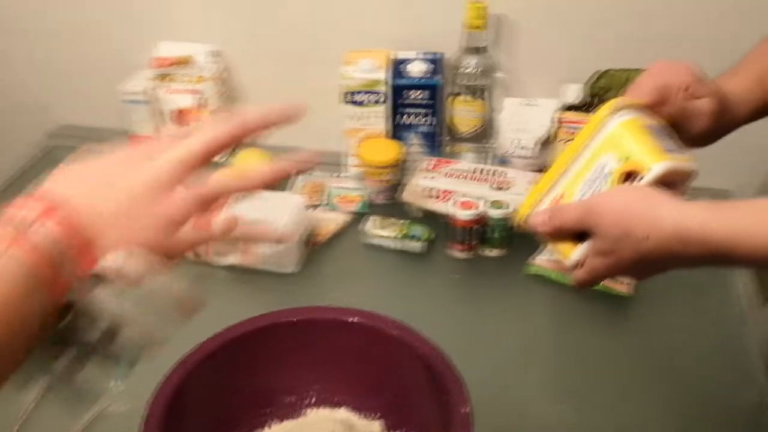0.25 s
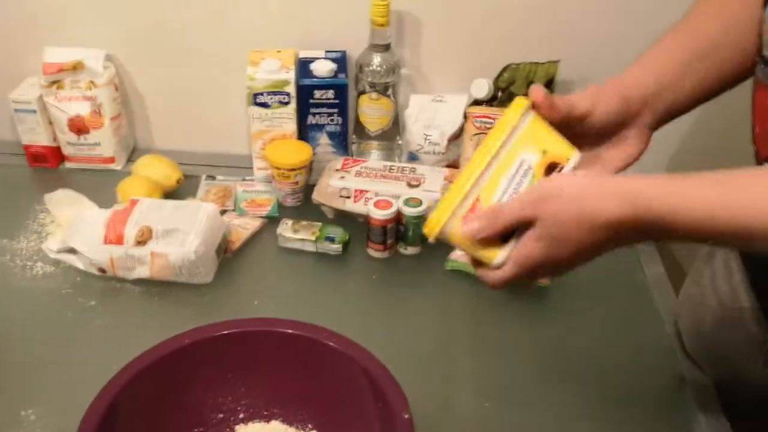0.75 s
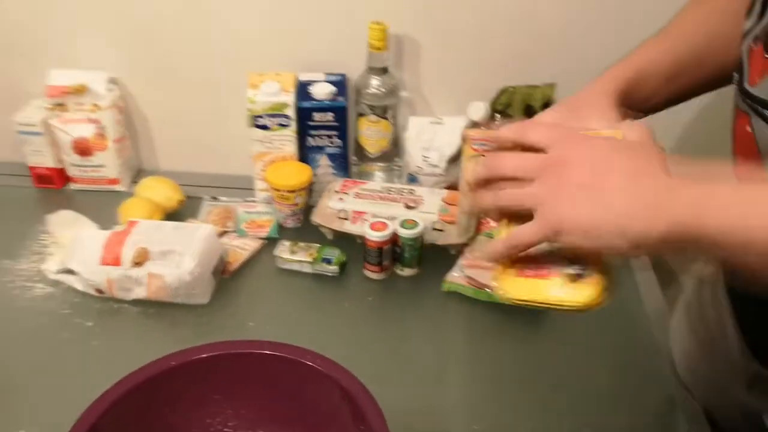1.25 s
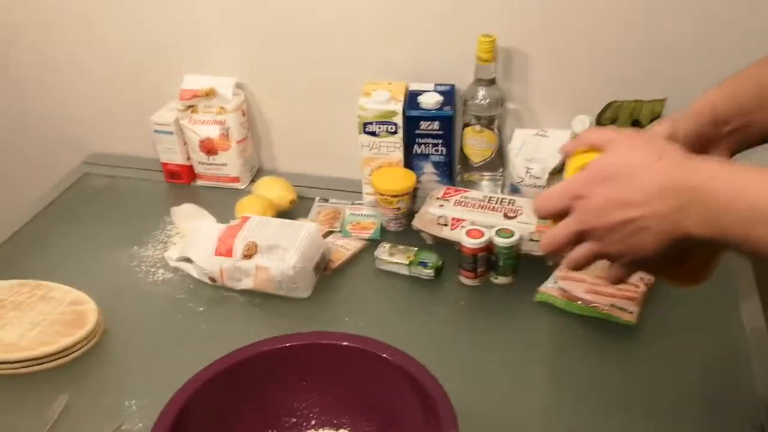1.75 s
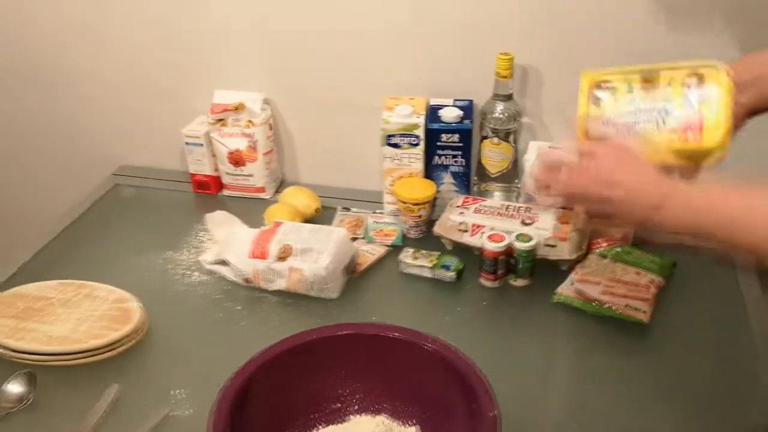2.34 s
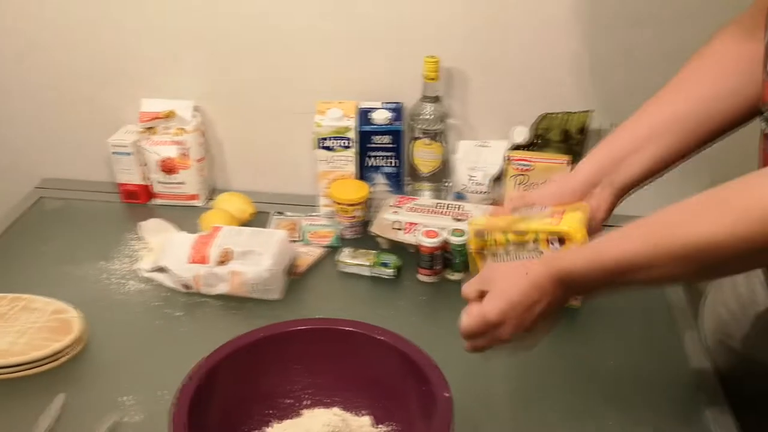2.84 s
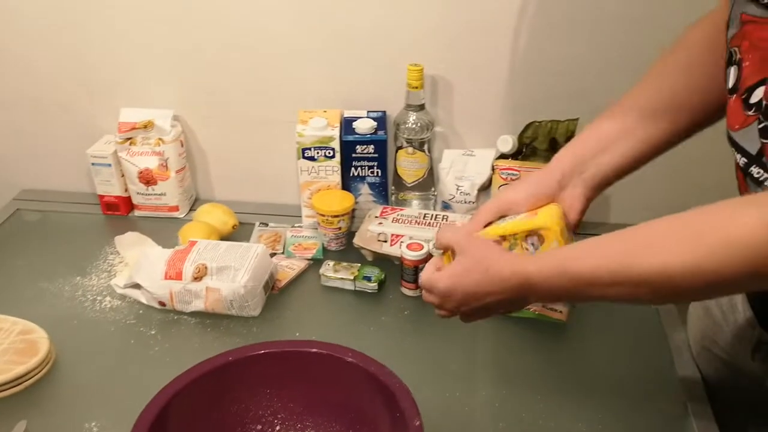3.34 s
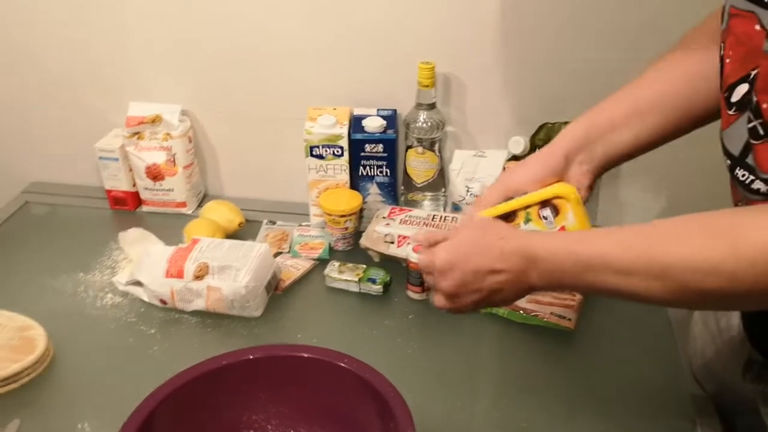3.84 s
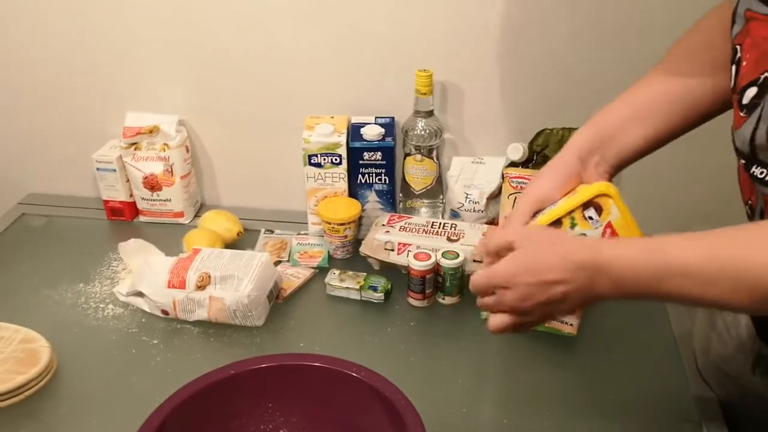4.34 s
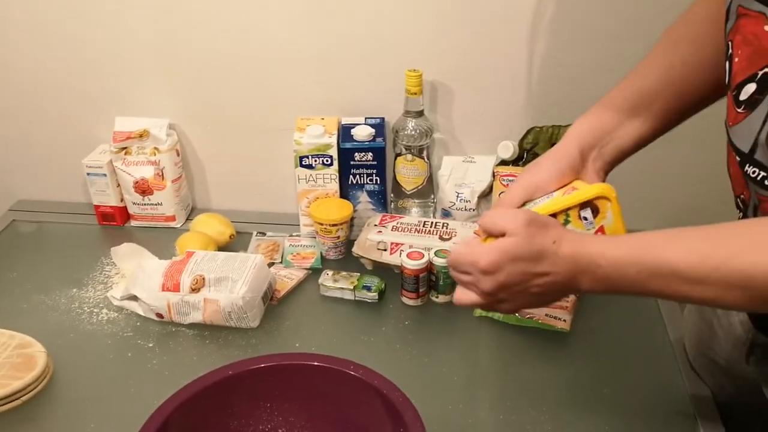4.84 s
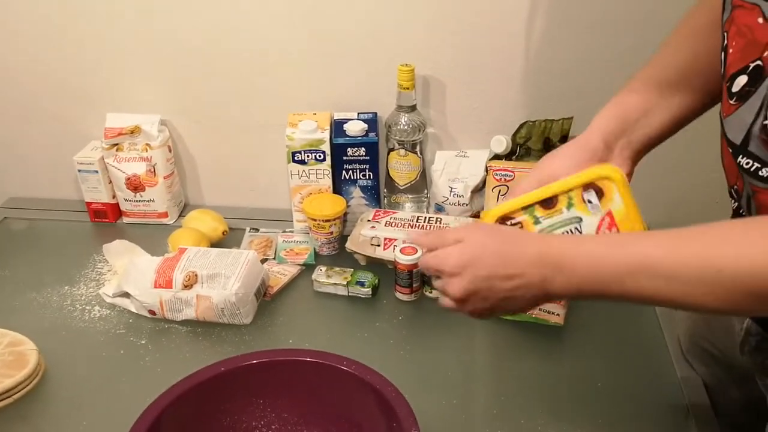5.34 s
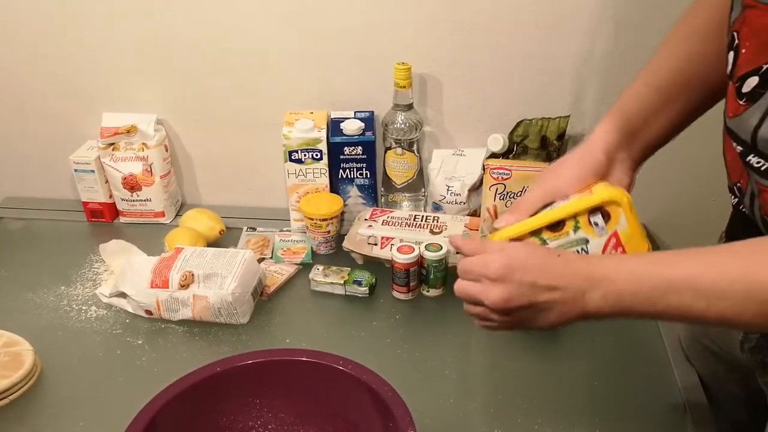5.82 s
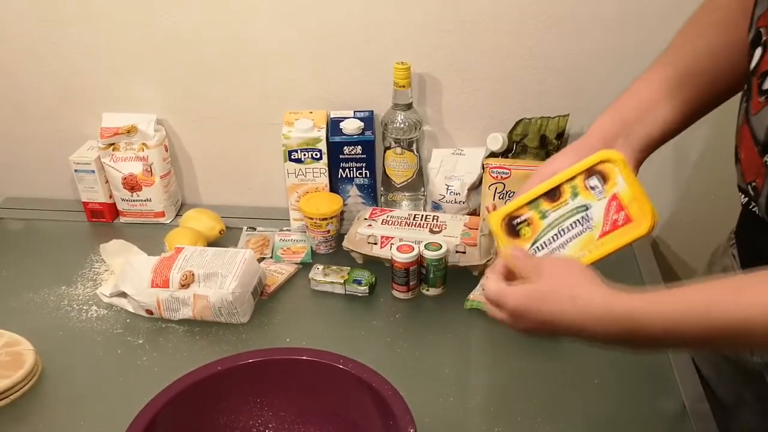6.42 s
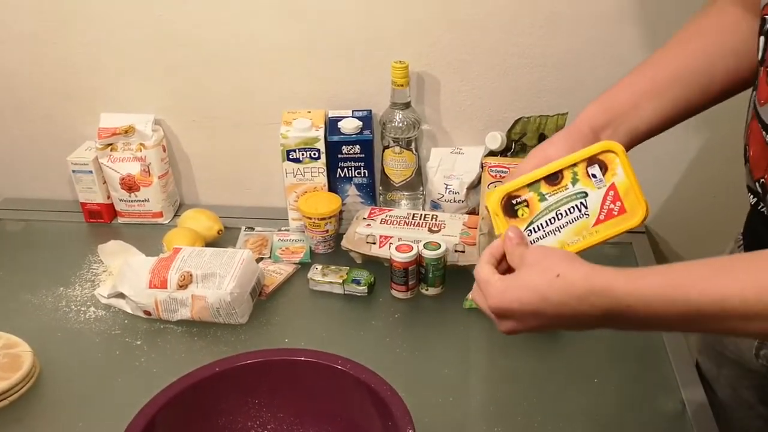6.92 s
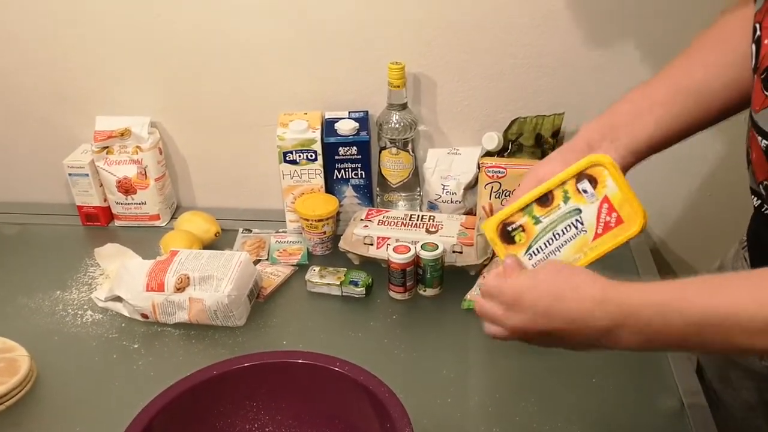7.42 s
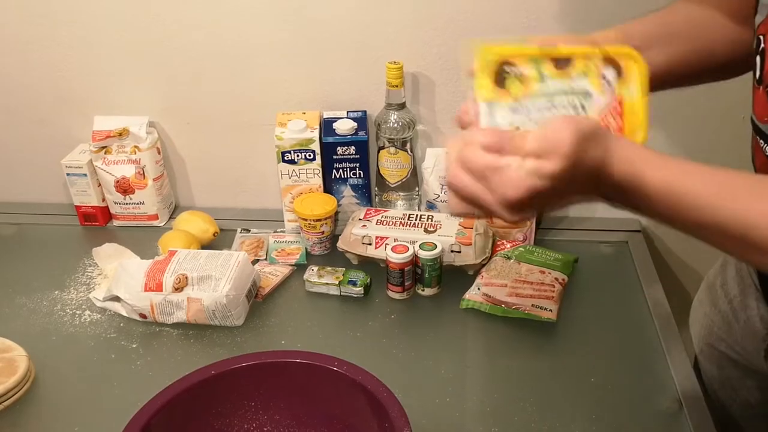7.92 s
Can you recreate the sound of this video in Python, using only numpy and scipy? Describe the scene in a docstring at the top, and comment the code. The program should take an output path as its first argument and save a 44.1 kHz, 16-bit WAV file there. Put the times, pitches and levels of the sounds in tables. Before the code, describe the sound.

Someone bends and picks at a plastic tub lid, making dry snaps and crackly creases, a loud table thump midway, and a burst of clicks at the end.

```python
"""A stiff plastic tub is bent and picked at over a kitchen table: lid and seal snap as noise bursts that drive
four parts of the tub; ticks crackle under the fingers. A hard small room rings on after both. Jolts rattle and
boom the table through resonances, one deep and narrow below the rest. Under it all lie filtered room tone, a
faint appliance hum of sines and low shaking. A spaced pair of small microphones hears it."""
import sys
import numpy as np
from scipy import signal
from scipy.fft import rfft, irfft, next_fast_len
from scipy.io import wavfile
from scipy.ndimage import uniform_filter1d

SR = 44100
rng = np.random.default_rng(int(sys.argv[2]) if len(sys.argv) > 2 else 0)


def master_out(mix):
    """Clip the mix to full scale and print it as 16-bit PCM to the path in sys.argv[1]."""
    frames = np.transpose(np.atleast_2d(mix))
    ceiling = np.clip(frames, -1, 1)
    pcm = np.round(ceiling * 32767).astype(np.int16)
    wavfile.write(sys.argv[1], SR, pcm)


N = 360297


def gain_of(db):
    """Amplitude factor of a level in dB."""
    return 10 ** (np.asarray(db) / 20)


def evened(x):
    """Scales to an rms of 1."""
    return x / np.sqrt(np.mean(x ** 2) + 1e-20)


def read(points, hz):
    """Interpolates (frequency, value) rows over log frequency."""
    f, value = np.transpose(points)
    return np.interp(np.log(hz + 1), np.log(f + 1), value)


def curve(rows):
    """Interpolates (time, value) rows at every sample."""
    return np.interp(np.arange(N) / SR, *np.transpose(rows))


def add(mix, start_s, sound):
    """Adds a sound in place, cut off at the end of the mix."""
    part = mix[..., round(start_s * SR):][..., :sound.shape[-1]]
    part += sound[..., :part.shape[-1]]


def colour(x, points):
    """Zero-phase filter with a (frequency [Hz], gain [dB]) response."""
    size = next_fast_len(N + SR)
    gain = gain_of(read(points, np.fft.rfftfreq(size, 1 / SR)))
    return irfft(rfft(x, size) * gain, size)[..., :N]


def resonate(x, hz, width_hz):
    """One-pole complex resonance with a peak gain of about 1."""
    r = np.exp(-np.pi * width_hz / SR)
    pole = r * np.exp(2j * np.pi * hz / SR)
    return 2 * signal.lfilter([1 - r], [1, -pole], x).real


# left-right likeness of diffuse sound: (frequency [Hz], likeness [0-1])
LIKENESS = [(60, 1.), (130, 0.28), (290, .7), (600, 0.28), (15000, 0.26)]


def diffuse(shape_db, length):
    """Stereo noise from random short-time spectra of level shape_db(hz, s), partly shared by the sides."""
    frames, hz = length // 128 + 6, np.fft.rfftfreq(512, 1 / SR)[:, None]
    a, b, c, d = rng.standard_normal((frames, 257, 4)).T
    left, other = a + 1j * b, c + 1j * d
    same = np.clip(read(LIKENESS, hz), 0, 1)
    right = same * left + np.sqrt(1 - same ** 2) * other
    spectra = np.array([left, right]) * gain_of(shape_db(hz, np.arange(frames) * 128 / SR))
    return signal.istft(spectra, nperseg=512, noverlap=384)[1][:, :length]


# room tone spectrum, relative: (frequency [Hz], density [dB per Hz])
TONE_SPECTRUM = [(15, -29), (25, -7.5), (45, -1.5), (96, -13), (200, -12), (244, -13), (404, -19),
                 (583, -26), (1140, -20.5), (1390, -30.5), (2240, -22), (4160, -29.5), (7300, -22),
                 (10200, -42.5), (13600, -33.5), (16500, -75.5)]
TONE_RMS_DB = -61.5
# appliance hum: (frequency [Hz], level before wavering [dB rms])
HUM_PARTIALS = [(196, -69), (297, -76.5), (398, -78)]
# shaking of floor and stand as people move: (time [s], level [dB])
SHAKING = [(0, -71), (.4, -59), (1.5, -84), (2.05, -55.5), (2.4, -63), (2.75, -65), (3.25, -57),
           (3.7, -49.5), (3.8, -30), (4.05, -35), (4.3, -48.5), (4.65, -58.5), (5.2, -60.5), (6.1, -63.5),
           (6.66, -55), (6.72, -46.5), (7.0, -59), (7.35, -87), (7.85, -78), (8.17, -66)]


def background():
    """Room tone and shaking are filtered noise; the hum is sines wavering slowly in level."""
    tone = gain_of(TONE_RMS_DB) * evened(colour(diffuse(lambda hz, s: 0 * hz, N), TONE_SPECTRUM))
    t = np.arange(N) / SR
    waver = evened(uniform_filter1d(rng.standard_normal((len(HUM_PARTIALS), N)), 9000))
    hum = np.zeros(N)
    for (hz, rms_db), w in zip(HUM_PARTIALS, waver):
        hum += np.sqrt(2) * gain_of(rms_db + 2.0 * w) * np.sin(2 * np.pi * hz * t)
    shake_spectrum = [(15, -30), (27, -9), (40, -0.5), (55, -9), (80, -25), (130, -24.5), (400, -68.0)]
    shake = evened(colour(rng.standard_normal(N), shake_spectrum))
    return tone + hum + gain_of(curve(SHAKING)) * shake


STROKE_RISE_SHARE, STROKE_ENDS_DB = 0.36, -24  # share of length spent swelling; ends relative to peak


def stroke(peak_s, peak_db, length_s):
    """Gain of one rub: rises to its peak and falls, linearly in dB, on past its nominal ends."""
    t = (np.arange(N) / SR - peak_s) / length_s
    distance = np.maximum(-t / STROKE_RISE_SHARE, t / (1 - STROKE_RISE_SHARE))
    return gain_of(peak_db + STROKE_ENDS_DB * distance)


# fingers rubbing and creasing the plastic: (time of peak [s], peak level [dB], length [s])
RUBS = [(0.757, -51, 0.26), (1.07, -59, 0.33), (1.365, -47, 0.11), (1.653, -56.5, 0.15),
        (1.919, -46.5, 0.099), (2.221, -36, 0.18), (2.55, -54.5, 0.2), (2.868, -33, 0.38),
        (3.83, -42, 0.39), (4.217, -41.5, 0.22), (4.495, -60, 0.13), (5.22, -28.5, 0.11),
        (5.282, -36.5, 0.37), (5.526, -70, 0.19), (6.31, -41.5, 0.12), (7.436, -69, .1),
        (7.846, -76, 0.088), (7.99, -33.5, 0.56)]
# crackle spectrum, relative: (frequency [Hz], density [dB per Hz])
CRACKLE_SPECTRUM = [(240, -29), (400, -6.5), (636, -29), (1010, -17), (1160, 4.5), (2290, 12), (4180, -4.5),
                    (7510, 5), (13900, -20), (16000, -50)]
HOLDING_DB, TICKS_PER_S = -67, 900  # hands merely holding; tick rate before clumping


def crackle():
    """Small uneven ticks of random sign under the fingers, in clumps, louder during each rub."""
    clumps = gain_of(6.0 * evened(uniform_filter1d(rng.standard_normal(N), 500)))
    size = gain_of(2.6 * np.minimum(rng.exponential(1, N), 4))
    happens = rng.random(N) < TICKS_PER_S * clumps / SR
    ticks = size * happens * rng.choice([-1., 1.], N)
    level = gain_of(HOLDING_DB) + sum(stroke(*row) for row in RUBS)
    return level * evened(colour(ticks, CRACKLE_SPECTRUM))


# snaps of lid and seal: (time [s], strength [dB], hollowness [dB], sharpness [dB],
# body pitch [Hz], wall pitch [Hz])
SNAP_EVENTS = [(0.1116, -37.5, -13.5, -9.5, 1060, 2530), (0.1644, -41.5, -5.5, -22, 1060, 2520),
               (0.19, -30, -12.5, -16.5, 1270, 2360), (0.2448, -32, -6, -11.5, 1040, 2030),
               (0.2987, -34, -25, -15.5, 1110, 2240), (0.4244, -31.5, -12, -13.5, 1470, 2420),
               (0.4464, -34.5, -4.5, -42, 1510, 1950), (0.7711, -36.5, -9.5, -9.5, 1040, 2210),
               (0.8265, -43, -10, -11, 1600, 2030), (1.0076, -29.5, -9, -9.5, 1260, 2480),
               (1.1189, -38, -7.5, -7, 1550, 2380), (1.2336, -47.5, 1.5, -34, 1350, 2160),
               (1.286, -40.5, -1, -43, 1540, 2370), (1.3134, -33.5, -9, -24, 1320, 2200),
               (1.3229, -29.5, -11, -38, 1550, 2360), (1.3818, -43.5, 2.5, -40, 1550, 1870),
               (1.4341, -39, -0.5, -0.5, 1180, 1880), (1.5628, -30, -18, -16.5, 1170, 2740),
               (1.5828, -37.5, -8.5, -1, 820, 2440), (1.6482, -40.5, -26, -1, 1580, 2410),
               (1.6731, -29.5, -13.5, -2, 850, 2480), (1.6894, -35.5, -7.5, -27, 1520, 2390),
               (1.8392, -32, -16, -4, 1570, 2380), (1.8784, -52, 3, 16.5, 1470, 2220),
               (1.9096, -30, -13.5, -12, 930, 2620), (1.9619, -28, -13, -9, 990, 2650),
               (1.9809, -32, -10, -1.5, 1270, 2100), (2.0228, -32.5, -13, -6.5, 1070, 2270),
               (2.0827, -27, -18, -11, 1500, 2710), (2.0956, -26, -11, -5.5, 960, 3020),
               (2.1084, -33.5, -0.5, -24, 1220, 2340), (2.1321, -23, -5, -24, 1630, 1910),
               (2.1474, -27, -12, 1.5, 1600, 2340), (2.1644, -26, -10, -14, 1550, 2560),
               (2.1834, -41.5, -28, 15, 1420, 1950), (2.2338, -18, -10.5, -17, 1060, 2400),
               (2.2484, -29, -14, -10, 940, 2270), (2.5731, -49.5, 3, 1.5, 1570, 1620),
               (2.603, -37, -14.5, -4.5, 953, 2530), (2.6284, -33, -12.5, -5.5, 940, 1810),
               (2.7217, -16.5, -13.5, -7, 1330, 2320), (2.7854, -35.5, -4.5, 7, 1270, 1664),
               (2.8464, -19, -17.5, -13, 1600, 1970), (2.8499, -12.5, -13.5, -7, 1660, 1990),
               (2.8584, -16, -9, -7.5, 1260, 1620), (3.3004, -31, -17.5, -19, 1303, 2270),
               (3.3209, -22.5, -11.5, -1, 1310, 2580), (3.7534, -9, -2, -13, 1360, 1600),
               (3.91, -33.5, 0.5, -28, 1036, 2230), (3.9539, -21.5, -10, -8.5, 1440, 2560),
               (4.1754, -14.5, -21, -10.5, 1517, 2600), (4.2854, -33.5, -12, -15, 1520, 2040),
               (4.3979, -51, 1, -17, 1260, 2090), (4.4368, -31, -25, 2.5, 1145, 2550),
               (4.5595, -51.5, -20, 7, 1480, 2330), (4.7631, -35.5, -9.5, -20.5, 1290, 2420),
               (4.798, -30, -8, -21.5, 1270, 2410), (5.1078, -56, 10, -25.5, 735, 1730),
               (5.1896, -11, -12, -5, 1530, 2100), (5.5184, -36.5, -10, -8, 1470, 2610),
               (5.7334, -47.5, -14, -7, 1510, 2030), (5.8631, -43.5, -21, 4.5, 1480, 2400),
               (5.9994, -58.5, -9.5, 13, 1580, 1690), (6.0691, -38.5, -18, 4, 1460, 1910),
               (6.2337, -46.5, -12.5, -3.5, 1490, 2260), (6.2901, -39, -9.5, 0, 1240, 2430),
               (6.4378, -31.5, -14, -9, 1170, 1780), (6.4984, -41.5, -18, 2.5, 1170, 1870),
               (6.5176, -42, -14, 6, 1340, 1770), (6.8124, -48.5, -24, 6, 1520, 2270),
               (7.1302, -39, -19, -22, 1580, 1820), (7.3662, -52, -2.5, -6.5, 1110, 1720),
               (7.4006, -57.5, 9, -11, 970, 1800), (7.4315, -36, -10, -5.5, 1230, 1850),
               (7.5777, -46, 1, -40, 1190, 2050), (7.7069, -17, -15, 0.5, 1600, 2500),
               (7.8106, -16, -11, -2, 1190, 1930), (7.9089, -10.5, -12.5, -5, 1310, 1870),
               (7.9339, -11, -17, -16, 1280, 2080), (7.9668, -8, -13.5, -6.5, 1600, 2430),
               (8.0661, -14.5, -10, -10, 1570, 2350)]
# drive of hollow body, wall, rim and edge: (level [dB])
PART_DRIVE_DB = [36.32, 32.05, 34.6, 40.23]
# band limits of the four parts: (frequency [Hz])
PART_LIMITS_HZ = [500, 1600, 3200, 6500, 17000]
# how the plastic radiates: (frequency [Hz], gain [dB])
TUB_RADIATION = [(240, -53.5), (400, -11.5), (572, -17.5), (1020, -1.5), (1500, -3), (1930, -1), (3170, -8),
                 (3650, -11), (4130, -11.5), (7010, -7), (8850, -12), (9870, -21.5), (13300, -24.5),
                 (15300, -33.5), (16500, -72)]
RIM_SHARE = 0.36  # of the sharpness given to the edge
SNAP_RISE_S, SNAP_T60_S, DIRECT_DB = 0.00041, 0.011, -0.27


def snaps():
    """Clusters of tiny cracks, as noise bursts, drive hollow body, wall, rim and edge in their bands.

    Rows: heard left, heard right, and summed over all directions, where the cracks even out to one click."""
    t, drive = np.arange(500) / SR, np.zeros((4, 3, N))
    envelope = (1 - np.exp(-t / SNAP_RISE_S)) * gain_of(-60 * t / SNAP_T60_S)
    noise = rng.standard_normal((len(SNAP_EVENTS), 4, 3, 500))
    for (s, db, hollow_db, sharp_db, body_hz, wall_hz), crack in zip(SNAP_EVENTS, noise):
        crack = (crack + 0.25 * crack[:, 2:]) * envelope  # last row is common to both sides
        crack[:, 2] = t == t[20]
        crack /= np.linalg.norm(crack, axis=2, keepdims=True)
        # squeezed hollow and bent wall ring at their own pitch in each snap
        crack[0] = 0.75 * crack[0] + 1.116 * resonate(crack[0], body_hz, 500)
        crack[1] = 0.37 * crack[1] + 1.267 * resonate(crack[1], wall_hz, 490)
        crack[:, :2] *= gain_of(DIRECT_DB)
        parts_db = db + np.add(PART_DRIVE_DB, [hollow_db, 0, RIM_SHARE * sharp_db, sharp_db])
        add(drive, s, gain_of(parts_db)[:, None, None] * crack)
    radiated = np.zeros((3, N))
    for low_hz, high_hz, part in zip(PART_LIMITS_HZ, PART_LIMITS_HZ[1:], drive):
        band = signal.butter(2, (low_hz, high_hz), "band", fs=SR, output="sos")
        radiated += signal.sosfilt(band, part)
    return colour(radiated, TUB_RADIATION)


# reverberation: (frequency [Hz], t60 [s])
ROOM_T60 = [(100, 0.44), (260, 0.81), (700, 0.57), (1840, 0.35), (4850, 0.53), (12800, 0.18)]
# early echoes: (delay [s], level [dB])
EARLY_ECHOES = [(.003, -4), (.007, -14), (.011, -13), (.014, -12), (.021, -16), (.032, -12)]
LEFT_LAG_SAMPLES = 26  # tub reaches the left microphone later
BUILD_UP_S, TURNS_PER_S = 0.008, 1.7


def room(left, right, whole, wet_db):
    """Direct sound, early echoes, and three diffuse tails taking turns so that successive snaps differ."""
    early = np.zeros((2, SR // 20))
    early[:, 0] = 1
    for s, db in EARLY_ECHOES:
        at = (s * SR * rng.uniform(.97, 1.03, 2)).astype(int)
        early[[0, 1], at] = gain_of(db) * rng.choice([-1, 1], 2)
    out = signal.oaconvolve(np.array([left, right]), early, axes=1)[:, :N]
    turn = np.arange(N) / SR * 2 * np.pi * TURNS_PER_S
    build_up = 1 - np.exp(-np.arange(SR) / SR / BUILD_UP_S)
    for k in range(3):
        tail = diffuse(lambda hz, s: -60 * s / read(ROOM_T60, hz), SR) * build_up
        tail *= gain_of(wet_db) / np.linalg.norm(tail[0])
        share = np.sqrt(2 / 3) * abs(np.cos(turn / 2 + k * np.pi / 3))
        out += signal.fftconvolve((whole * share)[None], tail, axes=1)[:, :N]
    return np.array([np.roll(out[0], LEFT_LAG_SAMPLES), out[1]])


# jolts reaching the table top: (time [s], rattle drive [dB], boom drive [dB], puff level [dB])
TABLE_JOLTS = [(0.238, -37, -35, -67), (0.799, -42, -22, -46.5), (1.699, -35.5, -26, -50),
               (2.13, -29, -4, -48), (2.243, -21, -9, -42), (2.851, -27, -21, -45),
               (3.239, -25, -14, -37.5), (3.321, -38, -16, -53), (3.754, -1, 22, -15),
               (4.048, -30, -8, -56), (5.189, -30.5, -12, -30.5), (5.256, -32.5, -22.5, -52),
               (6.512, -40, -16, -74), (6.692, -58, -0.5, -44), (7.707, -49, -15, -38),
               (7.809, -32, -23, -39.5), (7.908, -18.5, -35, -33), (7.968, -31, -24, -41),
               (8.066, -23, -28, -34)]
# table resonances, the deep boom first: (frequency [Hz], width [Hz], gain [dB])
TABLE_MODES = [(41.2, 6, -24), (68.3, 47, -3.5), (133, 39, -9.5), (153, 44, 1), (211.3, 32, 2.5),
               (283, 49.5, 1), (367.4, 61, -15.5)]
RATTLE_RISE_S, RATTLE_T60_S = 0.0046, 0.58


def table():
    """Each jolt is a dull puff, a push ringing the boom, and noise rattling the top and things on it."""
    t = np.arange(SR // 2) / SR
    puff, push, rattle = np.zeros((3, N))
    noise = rng.standard_normal((len(TABLE_JOLTS), SR // 2))
    for (s, rattle_db, push_db, puff_db), shudder in zip(TABLE_JOLTS, noise):
        add(puff, s, gain_of(puff_db) * np.hanning(160))
        add(push, s, gain_of(push_db) * np.hanning(200))
        decay = gain_of(rattle_db - 60 * t / RATTLE_T60_S)
        add(rattle, s, decay * (1 - np.exp(-t / RATTLE_RISE_S)) * shudder)
    (boom_hz, boom_width_hz, boom_db), *modes = TABLE_MODES
    boom = gain_of(boom_db) * resonate(push, boom_hz, boom_width_hz)
    top = np.zeros(N)
    for hz, width_hz, db in modes:
        top += gain_of(db) * resonate(resonate(rattle, hz, width_hz), hz, 3 * width_hz)
    return puff + boom + np.array([np.roll(top, 8), top])  # left 8 samples later


def scene():
    """Tub in the room, table and background."""
    return room(*(snaps() + crackle()), wet_db=0.98) + table() + background()


GATE_HALF_DB, GATE_SOFT_DB, GATE_FLOOR_DB = -44.376692, 4.5, -4.6  # half-way power, softness, lowest gain
GATE_SMOOTH_S, GATE_HIGHPASS_HZ = 0.005, 590.4


def gate(x):
    """The recorder softly turns down quiet sound, judged by smoothed power above the bass."""
    r = np.exp(-1 / (GATE_SMOOTH_S * SR))
    highpass = signal.butter(2, GATE_HIGHPASS_HZ, "high", fs=SR, output="sos")
    power = (signal.sosfilt(highpass, x) ** 2).mean(0)
    power_db = 10 * np.log10(signal.lfilter([1 - r], [1, -r], power) + 1e-12)
    return x * gain_of(GATE_FLOOR_DB / (1 + np.exp((power_db - GATE_HALF_DB) / GATE_SOFT_DB)))


# microphone port response: (frequency [Hz], left minus right [dB])
PORT_DIFFERENCE = [(60, 0.0), (110, 0.0), (200, 0.0), (380, 0.0), (700, 4), (1290, 0.5), (2380, -4),
                   (4400, -1.5), (8120, -2), (15000, -1.5)]
BAND_LIMIT_HZ = 16600


def record(dry):
    """Two ports of unlike response, gate, soft overload, low-pass."""
    ports = []
    for x, side in zip(dry, (1, -1)):
        ports.append(colour(x, [(hz, side * db / 2) for hz, db in PORT_DIFFERENCE]))
    heard = np.tanh(gate(np.array(ports)))
    lowpass = signal.firwin(511, BAND_LIMIT_HZ, window=("kaiser", 9), fs=SR)
    return signal.oaconvolve(heard, lowpass[None], "same")


dry = scene()
out = record(dry)
master_out(out)
```